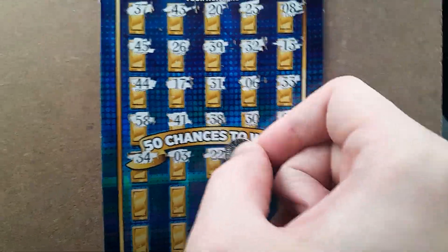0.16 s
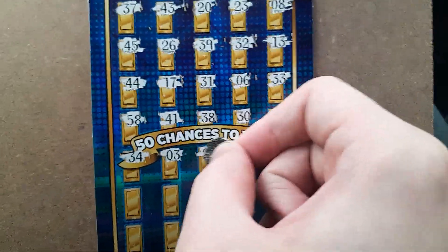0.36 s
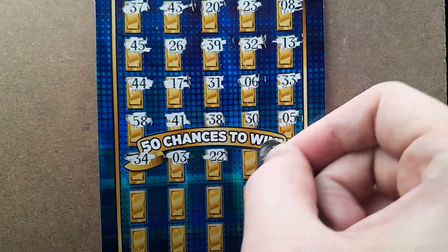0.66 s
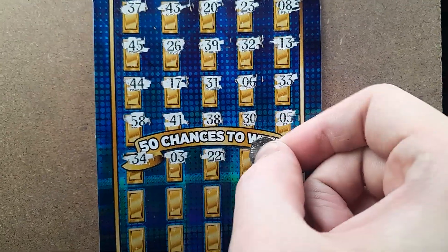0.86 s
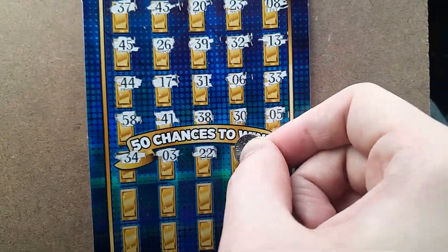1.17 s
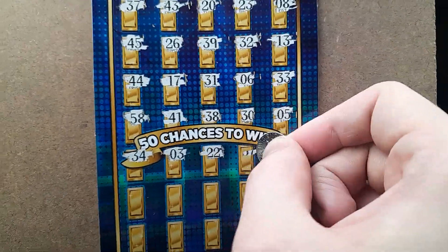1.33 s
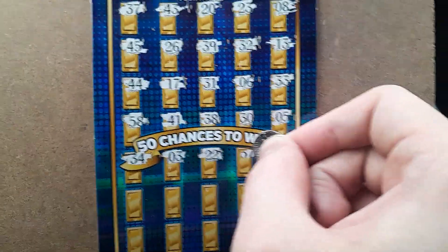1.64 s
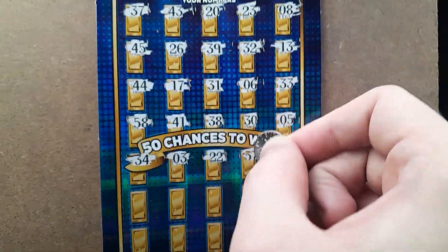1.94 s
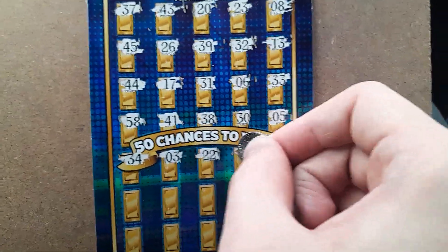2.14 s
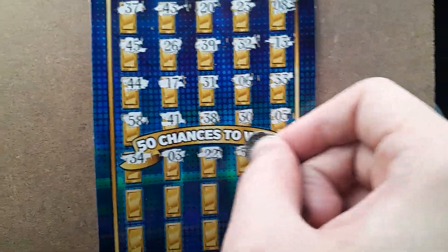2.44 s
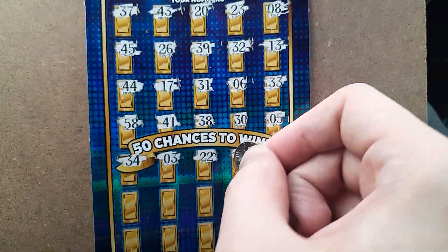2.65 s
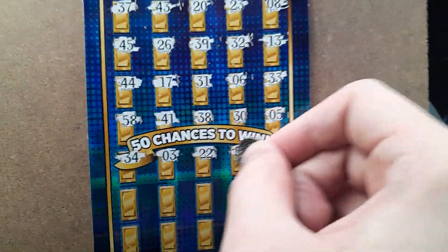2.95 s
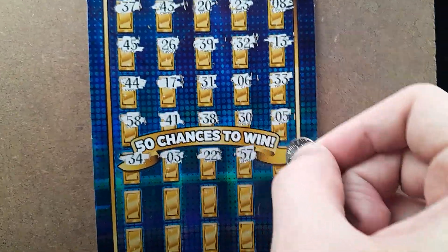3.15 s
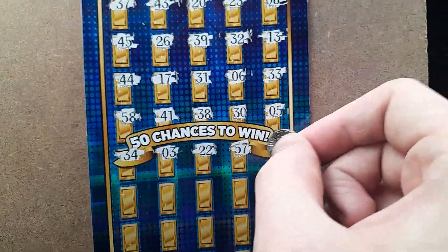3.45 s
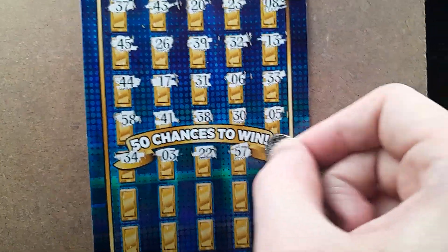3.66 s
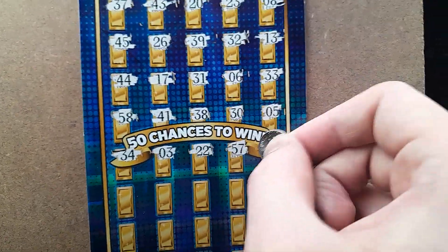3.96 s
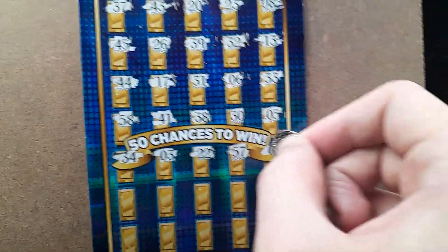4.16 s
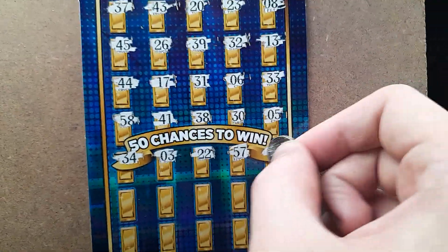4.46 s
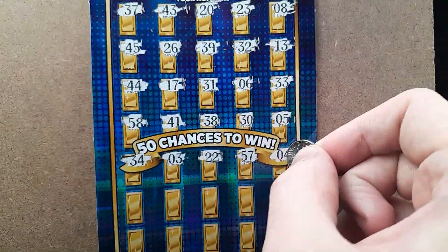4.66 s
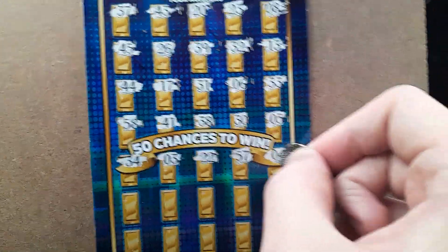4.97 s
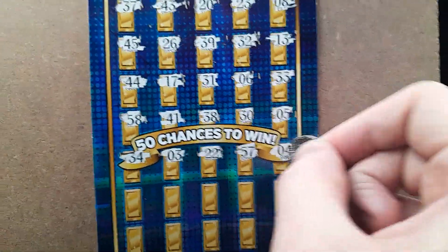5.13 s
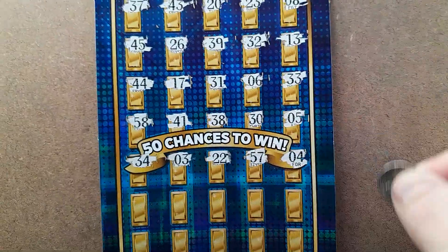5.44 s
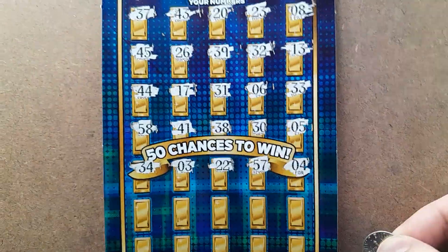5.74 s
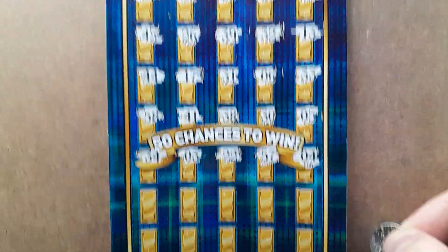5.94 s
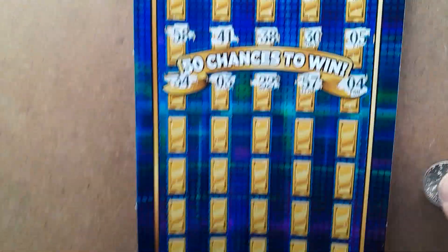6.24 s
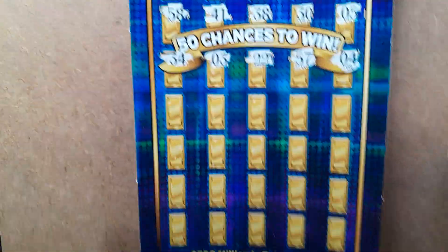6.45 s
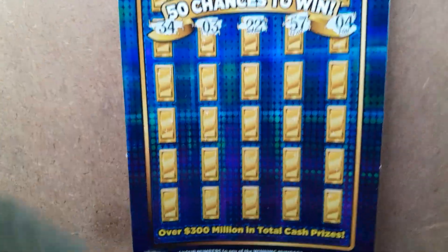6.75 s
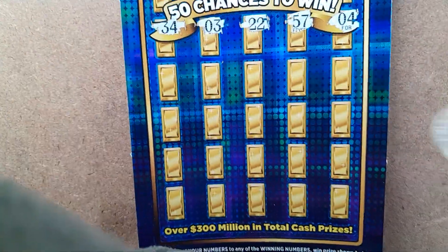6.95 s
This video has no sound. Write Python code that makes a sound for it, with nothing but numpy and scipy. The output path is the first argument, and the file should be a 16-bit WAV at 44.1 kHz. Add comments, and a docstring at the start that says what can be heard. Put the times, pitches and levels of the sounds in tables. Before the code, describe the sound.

A coin scratches a card ticket in quick rasping runs, then a hand slides off and bumps the table as a vehicle passes outside.

```python
"""In a quiet room a coin scratches three boxes of a card ticket on a table, about seven strokes a second.
The crumbling coating drives the resonances of card and table top, close to two microphones.
After 5.2 s the hand slides off, nudging the ticket and bumping the table twice. Meanwhile a vehicle
outside swells to a soft rumble: its engine peaks at 5.5 s, its tyres follow, and its whine sinks."""
import sys
import numpy as np
from scipy import signal
from scipy.io import wavfile
from scipy.ndimage import uniform_filter1d

SR = 44100
rng = np.random.default_rng(int(sys.argv[2]) if len(sys.argv) > 2 else 0)


def dump(signal):
    """Clip the signal to [-1, 1] and save it as 16-bit WAV at the path in sys.argv[1]."""
    limited = np.clip(np.atleast_2d(signal).T, -1, 1)
    pcm = np.round(limited * 32767).astype(np.int16)
    wavfile.write(sys.argv[1], SR, pcm)


N = 313110
TIME = np.arange(N) / SR


def from_db(db):
    """Decibels to gain."""
    return 10 ** (np.asarray(db) / 20)


def unit_rms(x):
    """Scale to rms 1."""
    return x / np.sqrt(np.mean(x ** 2) + 1e-20)


def at_hz(points, hz):
    """Interpolate on a log-frequency axis."""
    points_hz, values = np.transpose(points)
    return np.interp(np.log(hz), np.log(points_hz), values)


def butter(x, hz, kind, order=2):
    """Butterworth filter."""
    sos = signal.butter(order, np.minimum(hz, .47 * SR), kind, fs=SR, output="sos")
    return signal.sosfilt(sos, x)


def resonate(x, hz, width_hz):
    """Two-pole resonance, peak gain 1."""
    r = np.exp(-np.pi * width_hz / SR)
    feedback = [1, -2 * r * np.cos(2 * np.pi * hz / SR), r * r]
    return signal.lfilter(np.array([1, 0, -1]) * (1 - r * r) / 2, feedback, x + 1e-18)


def drift(rate_hz):
    """Smooth random curve, rms 1."""
    hop, settle = 40, 2000
    r = np.exp(-2 * np.pi * hop * rate_hz / SR)
    white = rng.standard_normal(N // hop + settle + 2)
    slow = signal.lfilter([1], [1, -2 * r, r * r], white)[settle:]
    return np.interp(np.arange(N) / hop, np.arange(len(slow)), unit_rms(slow))


def wavering_tone(hz, width_hz):
    """Tone unsteady in phase and level, rms 1."""
    phase = 2 * np.pi * np.cumsum(hz) / SR
    return drift(width_hz) * np.sin(phase) + drift(width_hz) * np.cos(phase)


def stereo(pair, correlation, pan_db=0):
    """Mix two independent signals to left and right."""
    sides = np.array([[1], [-1]])
    mid = np.sqrt((1 + correlation) / 2) * pair[0]
    side = np.sqrt((1 - correlation) / 2) * pair[1]
    return (mid + side * sides) * from_db(sides * pan_db / 2)


def white_noise(correlation, pan_db=0):
    """Stereo white noise."""
    return stereo(rng.standard_normal((2, N)), correlation, pan_db)


# distant sound at the two microphones: f/Hz, left-right correlation
CORRELATION = [(60, .95), (250, 0.76), (500, 0.33), (1000, -0.52), (1800, 0.11), (4000, -0.024),
               (15000, -0.033)]


def coloured_noise(spectrum):
    """Stereo noise shaped in roughly third-octave bands, rms 1."""
    low_hz, high_hz = spectrum[0][0], spectrum[-1][0]
    edges_hz = np.geomspace(low_hz, high_hz, int(3 * np.log2(high_hz / low_hz)) + 2)
    white, mid_side = rng.standard_normal((2, 2, N)), np.zeros((2, N))
    for k, band in enumerate(zip(edges_hz, edges_hz[1:])):
        hz = np.sqrt(band[0] * band[1])
        correlation = at_hz(CORRELATION, hz)
        gains = from_db(at_hz(spectrum, hz)) * np.sqrt([[1 + correlation], [1 - correlation]])
        mid_side += gains * butter(white[k % 2], band, "band")
    return unit_rms(stereo(mid_side, 0))


def pushes(rows, sharpness=1, stick_db=0):
    """Force that swells and fades for each row (t/s, length/s, level/dB); sharper is briefer."""
    rise_share, roundness, end_drop_db = 0.58, 1.86, 20.5
    slip_from, slip_to = -0.41, 0.35  # lengths from the peak; outside, the contact sticks
    power = np.zeros(N)
    for s, length_s, db in rows:
        near = slice(max(int((s - 2 * length_s) * SR), 0), int((s + 2 * length_s) * SR))
        lag = (TIME[near] - s) / length_s
        away = np.abs(lag / np.where(lag < 0, rise_share, 1 - rise_share)) ** roundness
        stuck = (lag < slip_from) | (lag > slip_to)
        power[near] += from_db(db - end_drop_db * sharpness * away - stick_db * stuck) ** 2
    return np.sqrt(power)


def impulses(rows):
    """One impulse for each row (t/s, level/dB)."""
    hits = np.zeros(N)
    for s, db in rows:
        hits[int(s * SR)] = from_db(db)
    return hits


# room air and microphone hiss: f/Hz, relative density/dB
AIR_SPECTRUM = [(30, -5), (200, 22), (400, -1), (900, 7.5), (2200, 2), (3500, -1), (5500, -2), (7600, 8),
                (9000, 2.5), (15500, 4.5)]
# slow wander under the hiss: f/Hz (sets a constant phase only), level/dB
WANDER = [(61, -66), (117, -66), (210, -71)]


def quiet_room():
    """Steady hiss over a faint subsonic wander."""
    air = from_db(-79) * coloured_noise(AIR_SPECTRUM)
    return air + sum(from_db(db) * wavering_tone(hz, width_hz=2.3) for hz, db in WANDER)


# vehicle, by part: peak t/s, level/dB, half width/s, loss per tenfold distance/dB
VEHICLE_PARTS = {"rumble": (5.5, -49, 1.5, 31.5), "drone": (5.5, -47.5, 1.16, 28),
                 "roar": (6, -54.5, 0.98, 36.5), "tyre hiss": (6.5, -60, 0.72, 40),
                 "tread": (7, -73.5, 0.7, 47), "engine": (5.5, -48, 0.71, 29.5),
                 "whine": (6.5, -57, 0.41, 28.5)}


def passing(part):
    """Gain of a vehicle part, falling with distance either side of its peak."""
    s, db, width_s, loss_db = VEHICLE_PARTS[part]
    distance = np.hypot(1, (TIME - s) / width_s)
    return from_db(db - loss_db * np.log10(distance))


# broad vehicle noises: f/Hz, relative density/dB
RUMBLE_SPECTRUM = [(25, -15.5), (40, -11), (60, 6), (80, -11.5), (110, -14.5), (160, -44)]
DRONE_SPECTRUM = [(70, -17), (110, -1), (150, -5.5), (200, -8.5), (260, -15), (380, -62)]
ROAR_SPECTRUM = [(170, -6.5), (260, 9), (350, 0), (500, 0.5), (650, -12.5), (850, -39), (1200, -18.5)]
TYRE_HISS_SPECTRUM = [(420, -7), (600, 19), (750, 7), (900, 0.5), (1100, -19), (1500, -5), (2000, 5),
                      (2700, -17), (3400, -12.5), (5000, -21.5), (7600, -3.5), (9000, -27)]


def vehicle_noise():
    """Heard through the wall: rumble and drone peak first, then the tyres."""
    rumble = passing("rumble") * coloured_noise(RUMBLE_SPECTRUM) * from_db(0.5 + 2.16 * drift(9.3))
    drone = passing("drone") * coloured_noise(DRONE_SPECTRUM) * from_db(-1 + 0.93 * drift(10))
    roar = passing("roar") * coloured_noise(ROAR_SPECTRUM)
    hiss = from_db(-3.5) * passing("tyre hiss") * coloured_noise(TYRE_HISS_SPECTRUM)
    tread = passing("tread") * unit_rms(butter(white_noise(0.1), (1850, 2850), "band", order=4))
    return rumble + drone + roar + hiss + tread


# engine firing rate: t/s, f/Hz
FIRING_RATE = [(0, 114.2), (4, 128.2), (4.7, 142.7), (5.6, 157.2), (7.1, 152)]


def engine():
    """Firing tone and its octave; the engine speeds up on approach."""
    firing_hz = np.interp(TIME, *np.transpose(FIRING_RATE))
    fundamental = wavering_tone(firing_hz, width_hz=9.7)
    octave = from_db(-16.5) * wavering_tone(2 * firing_hz, width_hz=9.5)
    return passing("engine") * (fundamental + octave)


def whine():
    """Doppler shift lowers the whine as the vehicle goes by."""
    rest_hz, mach, pass_s, half_width_s = 491, 0.057, 6.3, 0.55
    receding = (TIME - pass_s) / np.hypot(TIME - pass_s, half_width_s)
    return passing("whine") * wavering_tone(rest_hz / (1 + mach * receding), width_hz=18.4)


def reflections(x, t60_s, first_s):
    """Diffuse tail of a small furnished room."""
    t = np.arange(SR // 2) / SR
    tail = rng.standard_normal((2, len(t))) * from_db(-60 * t / t60_s) * (t > first_s)
    tail /= np.sqrt(np.sum(tail ** 2, axis=1, keepdims=True))
    return butter(signal.fftconvolve(x, tail, axes=1)[:, :N], 8500, "low", order=1)


# heel of the hand shifting, hand dragging off: peak t/s, length/s, level/dB
HAND_SHIFTS = [(1.92, 0.47, -53.5), (2.46, .3, -55), (3.15, 0.78, -54.5), (5.05, .5, -54), (6.8, 0.33, -60)]
HAND_DRAGS = [(5.75, 0.53, -71), (6.3, 0.61, -65.5)]
# drag rustle: f/Hz, relative density/dB
DRAG_SPECTRUM = [(600, 3), (900, -1), (1300, 4), (2000, -2), (2800, -8), (3400, -19), (5000, -14),
                 (7700, -17), (9000, -32)]


def hand_on_table():
    """The table rumbles under the shifting hand and rustles as it drags away."""
    rumble = pushes(HAND_SHIFTS) * coloured_noise(RUMBLE_SPECTRUM)
    rustle = pushes(HAND_DRAGS) * coloured_noise(DRAG_SPECTRUM) * from_db(0.78 * drift(40))
    return rumble + rustle


# hand bumping the table: t/s, peak level/dB
HAND_BUMPS = [(5.613, -42.5), (6.297, -31.5)]


def hand_bumps():
    """Dull thuds ring the table's lowest mode."""
    mode_hz, width_hz = 183.7, 15
    ring = resonate(impulses(HAND_BUMPS), mode_hz, width_hz) * SR / (2 * np.pi * width_hz)
    return butter(ring, 360, "low")


# skin over card and table: peak t/s, length/s, level/dB
SKIN_BRUSHES = [(0.12, 0.71, -78.5), (0.66, 0.22, -68), (2.51, 0.41, -78.5), (3.115, 0.2, -64),
                (5.05, .22, -70), (5.335, 0.33, -65), (5.52, .36, -66.5), (5.622, 0.071, -58.5),
                (5.7, 0.13, -65.5), (5.825, 0.21, -68), (6.08, 0.93, -81), (6.26, 0.22, -65.5),
                (6.45, 0.44, -70), (6.59, .13, -69), (6.82, 0.1, -68), (7.08, 0.19, -69)]
# brief high swishes, the coin's hard catch at 0.21 s, then skin on the card: t/s, half length/s, level/dB
HIGH_SWISHES = [(0.213, 0.0095, -54.5), (0.656, .012, -63.5), (5.417, 0.015, -64), (5.615, 0.0099, -58),
                (6.59, .025, -77), (6.816, 0.034, -68.5)]
# their spectra: f/Hz, relative density/dB
SKIN_SPECTRUM = [(300, 12), (900, -0.5), (2200, -0.5), (3500, -5), (5500, -0.5), (6500, -7), (7700, 6),
                 (9000, -26), (11000, -4), (13500, -12.5), (16000, 3)]
SWISH_SPECTRUM = [(5000, -2), (9500, -10), (13000, -7), (16000, 0)]


def brushes_and_swishes():
    """Fine-grained friction: skin brushes, and brief high swishes from the coin's catch, then skin."""
    grain = from_db(1.5 * drift(33) + 1.4 * drift(250))
    brush = from_db(0.5) * pushes(SKIN_BRUSHES) * coloured_noise(SKIN_SPECTRUM)
    swish = sum(from_db(db) * np.exp(-((TIME - s) / half_s) ** 2) for s, half_s, db in HIGH_SWISHES)
    return (brush + swish * coloured_noise(SWISH_SPECTRUM)) * grain


# light taps of coin and fingers: t/s, level/dB, hardness/dB
LIGHT_TAPS = [(0.257, -89, 21), (0.65, -60, -0.5), (2.266, -62, 8), (2.461, -59, 8.5), (3.056, -58, 6.5),
              (3.235, -71.5, -14), (3.636, -66, 0), (3.758, -64, -2), (4.045, -65, 0), (4.405, -56, -4),
              (5.216, -52, -10), (5.309, -62, -7), (5.407, -77, 13), (5.609, -61.5, 9), (5.726, -67, -10),
              (6.249, -57, 7.5), (6.294, -58.5, -19)]


def tap_force(brightness, decay_s):
    """Instant onset, fast decay; positive brightness favours hard taps, negative soft ones."""
    hits = impulses((s, db + brightness * hardness_db) for s, db, hardness_db in LIGHT_TAPS)
    return signal.lfilter([1], [1, -np.exp(-1 / (decay_s * SR))], hits + 1e-18)


# coin on boxes 1-3: start t/s, end t/s
BOX_SPANS = [(0, 0.6), (0.9, 3.05), (3.3, 5.25)]


def by_box(values):
    """Hold one value on each box and glide between boxes."""
    return np.interp(TIME, np.ravel(BOX_SPANS), np.repeat(values, 2))


# card on table: f/Hz, width/Hz, level/dB from box 1, 2, 3, left minus right/dB, left lag/ms
TABLE_MODES = [(220.5, 62, -7, -5.5, -11, -0.5, 0.3), (343.4, 30.6, -3.5, -8.5, -6.5, -4, 0.07),
               (379, 38.6, 0.5, -4, -13, -4.5, 0.06), (459, 36, -9, -12.5, -11.5, 0, 0.03),
               (566, 34, -34, -23.5, -19.5, 10.5, 0.39), (841, 56, -23.5, -32.5, -27.5, 14, 0.32),
               (1108, 22, -18, -28.5, -19, 0.5, 0.07), (1196, 35.0, -31, -14.5, -16, -2.5, 0.22),
               (1337.5, 64, -16.5, -17, -11.5, 6, 0.12), (1609, 65, -14.5, -13.5, -17, 10.5, 0.26),
               (1725, 51, -16, -43, -16.5, -2.5, 0.43), (1907, 56, -12, -17.5, -11, 3.5, 0.35),
               (2104, 25, -59, -12.5, -11, 1, 0.3), (2345, 52, -14, -16.5, -24.5, -4, 0.01),
               (2420, 71, -20.0, -14, -18, -0.5, 0.21), (2664, 24, -29, -26, -33.5, 2.5, 0.28),
               (3020, 24, -26, -29, -51, -0.5, 0.11), (3163, 170, -40, -20, -28, -8, 0.41),
               (3780, 170, -47, -29.5, -32, -5, 0.21), (4030, 58, -28, -23, -35.5, -13, 0.24),
               (4290, 70, -32, -25, -36, -14.5, 0.11), (4700, 380, -28.5, -30, -34.5, -4, 0.17),
               (5050, 240, -33, -35.5, -36.5, -16, 0.21), (5766, 280, -37, -25, -33, -2.5, 0.13),
               (6550, 260, -52, -23, -29.5, 1.5, 0.32), (6970, 175, -52, -42, -32, 5.5, 0.13),
               (7100, 210, -30, -36.5, -35.5, 4, 0.17), (7800, 410, -33, -33, -40, -17, 0.3)]


def table_top(force, low_hz, high_hz, correlation):
    """Each grain kicks each mode in range at a random strength; the coin's place weights the modes."""
    out, box_power = np.zeros((2, N)), 0
    active = np.flatnonzero(np.abs(force) > 1e-7)
    noise = rng.standard_normal((2, 2 * N))
    for hz, width_hz, *box_db, pan_db, lag_ms in TABLE_MODES:
        if low_hz <= hz < high_hz:
            grip_db = 2.75 * drift(4.14) - 0.84  # the grip shifts from stroke to stroke
            drive = force * from_db(by_box(box_db) + grip_db)
            strengths = stereo(noise[:, active + rng.integers(N)], correlation, pan_db)
            kicks = np.zeros((2, N))
            kicks[:, active] = strengths * drive[active]
            kicks[0] = np.roll(kicks[0], round(lag_ms * SR / 1000))
            out += resonate(kicks, hz, width_hz)
            box_power += from_db(box_db) ** 2 * np.pi * width_hz / SR
    return out / np.sqrt(by_box(box_power))


def grains(per_s, spread_db, clump_db, clump_hz):
    """Tiny fractures, random and in clumps, rms 1."""
    sizes = from_db(spread_db * np.minimum(rng.exponential(1, N), 4))
    breaks = rng.random(N) < per_s / SR
    return unit_rms(sizes * breaks * from_db(clump_db * drift(clump_hz)))


# coin strokes: peak t/s, length/s, rasp level/dB, knock over rasp/dB, hiss over rasp/dB
COIN_STROKES = [(0.079, 0.085, -54, 5.5, -9), (0.206, 0.092, -55.5, 6, -4), (0.213, 0.035, -41.5, 4, -6),
                (0.34, 0.072, -59, 10, -10.5), (0.466, 0.09, -63, 1, -11), (0.969, 0.071, -57, -2, -20.5),
                (1.134, 0.059, -59.5, 2, -17), (1.165, 0.052, -54.5, 7, -8), (1.364, 0.1, -55, 0, -4),
                (1.517, 0.094, -60.0, 11.5, -11.5), (1.679, 0.086, -53, -0.5, -3.5),
                (1.833, 0.139, -60, 10.5, -13.5), (1.903, 0.088, -54.5, 0, -8.5),
                (1.958, 0.11, -54.0, -1.5, -6), (2.106, 0.069, -68, 10, -12.5),
                (2.266, 0.071, -55.5, 3, -4), (2.363, 0.08, -61.5, 15.5, -17),
                (2.393, 0.044, -51.5, 4.5, -10.5), (2.493, 0.2, -67, 9.5, -8),
                (2.656, 0.074, -59.5, 1.5, -14.5), (2.798, 0.09, -55.5, 2, -2.5),
                (2.931, 0.082, -51.5, 4, -5.5), (3, 0.066, -61.5, 9, -9.5),
                (3.405, 0.085, -47.5, 5.5, -14.5), (3.55, 0.085, -54.5, 1.5, -2.5),
                (3.673, 0.1, -57.5, 7.5, -20), (3.699, 0.057, -49, 0.5, -10.5), (3.831, 0.1, -52, -3.5, -2),
                (3.977, 0.084, -58, 5, -17), (4.003, 0.057, -51.5, 1.5, -16.5),
                (4.065, 0.058, -52.5, 0.5, -10.5), (4.118, 0.12, -52.5, 4.5, -2.5),
                (4.23, 0.21, -64, 5, -24), (4.388, 0.19, -65.5, 12, -16), (4.488, 0.099, -60, 7.5, -23),
                (4.533, 0.06, -50.5, -2.5, -17), (4.634, 0.12, -50.0, -2.5, -12),
                (4.781, 0.061, -49, 3, -17.5), (4.932, 0.09, -47.5, -1.5, -9.5),
                (5.015, 0.038, -52.5, 1, -27), (5.053, 0.1, -53, 2.5, -25),
                (5.219, 0.049, -50.5, -1.5, -17)]
# faint steady rub of the resting hand during boxes 1-3: level/dB
HAND_RUB_DB = [-80, -87, -76]


def stroke_force(offset_db, sharpness, rub_db):
    """Strokes, held back until the coin breaks loose, over the faint rub of the resting hand."""
    rub = sum(from_db(db + rub_db) * ((TIME >= start_s) & (TIME < end_s))
              for (start_s, end_s), db in zip(BOX_SPANS, HAND_RUB_DB))
    s, length_s, db = np.transpose(COIN_STROKES)[:3]
    strokes = pushes(zip(s, length_s, db + offset_db), sharpness, stick_db=4)
    return np.hypot(strokes, uniform_filter1d(rub, size=SR // 10))


# fresh coating breaking away on boxes 1-3: relative level/dB
BOX_CRUNCH_DB = [4, 5, 11]


def coin():
    """The rim catches, slips and crumbles the coating: knock, rasp, hiss and a fizz of flakes."""
    slips = grains(per_s=2500, spread_db=2.5, clump_db=3, clump_hz=126)
    crumbs = grains(per_s=6000, spread_db=3, clump_db=1, clump_hz=240)
    knock_db, hiss_db = np.transpose(COIN_STROKES)[3:]
    # brighter parts need more pressure, so they are briefer
    knock_force = slips * stroke_force(knock_db, sharpness=0.84, rub_db=2)
    knock_force += from_db(11.5) * tap_force(brightness=-0.54, decay_s=0.0036)
    rasp_force = from_db(-2.02) * crumbs * stroke_force(0, sharpness=1.05, rub_db=-2.5)
    rasp_force += from_db(-1) * tap_force(brightness=0, decay_s=0.012)
    hiss_force = from_db(-0.66) * crumbs * stroke_force(hiss_db, sharpness=1.36, rub_db=-14)
    hiss_force += from_db(-7) * tap_force(brightness=0.8, decay_s=0.0028)
    crack_force = tap_force(brightness=0.95, decay_s=0.0012)

    knock_top_hz, rasp_top_hz = 700, 3100
    knock = table_top(knock_force, 0, knock_top_hz, correlation=1)
    rasp = table_top(rasp_force, knock_top_hz, rasp_top_hz, correlation=1)
    hiss = table_top(hiss_force, rasp_top_hz, SR, correlation=0.75)
    body = butter(knock, (130, 1200), "band")
    body += butter(rasp, (550, 3400), "band", order=4)
    body += butter(hiss, (2400, 8400), "band", order=6)

    crunch = resonate(hiss_force * white_noise(-0.29), hz=2590, width_hz=380)
    crunch *= from_db(7.5 + by_box(BOX_CRUNCH_DB))
    flakes = hiss_force * white_noise(0.084, pan_db=-1.5)
    fizz = from_db(-11.5) * butter(flakes, 7500, "high")
    fizz += from_db(-8.5) * resonate(flakes, hz=13200, width_hz=700)
    card_rasp = from_db(2.5) * butter(rasp_force * white_noise(0.19, pan_db=2.5), (500, 1150), "band")
    grit = from_db(-2.5) * butter(hiss_force * white_noise(0.3, pan_db=1), (2700, 3900), "band")
    crack = from_db(-1) * butter(crack_force * white_noise(0.4), (3500, 9500), "band")
    return body + card_rasp + grit + crack + crunch + fizz


def scene():
    """Coin and hand close by, the room around them, the street beyond."""
    near = coin() + brushes_and_swishes() + hand_bumps()
    room = from_db(-22) * reflections(near, t60_s=0.21, first_s=0.026)
    return near + room + hand_on_table() + vehicle_noise() + engine() + whine() + quiet_room()


def record(dry):
    """Band limit: drops the deepest bass and the top."""
    low_hz, high_hz = 31, 15750
    no_bass = butter(dry, low_hz, "high", order=4)
    return signal.sosfilt(signal.ellip(12, .1, 80, high_hz, fs=SR, output="sos"), no_bass)


dry = scene()
out = record(dry)
dump(out)
```